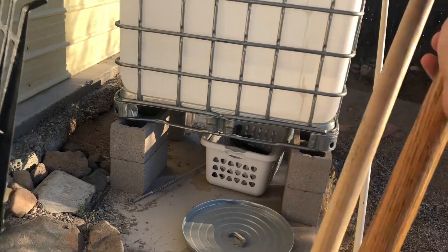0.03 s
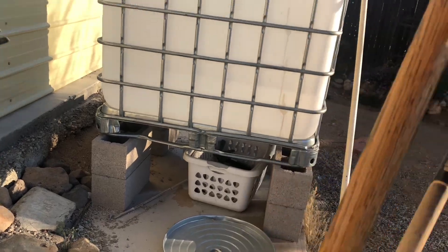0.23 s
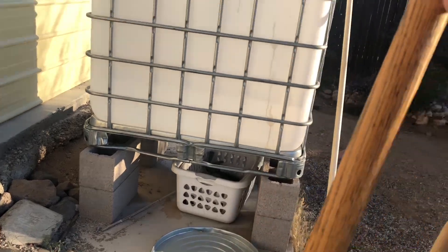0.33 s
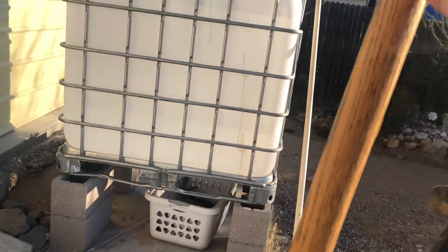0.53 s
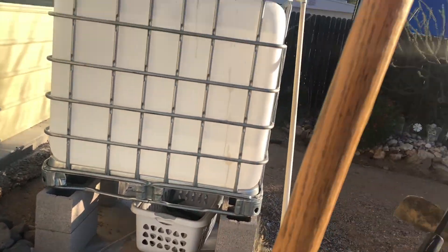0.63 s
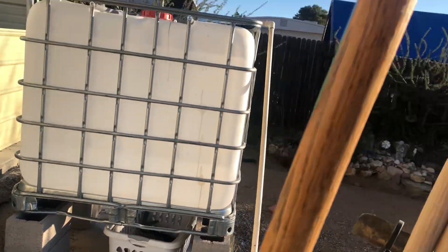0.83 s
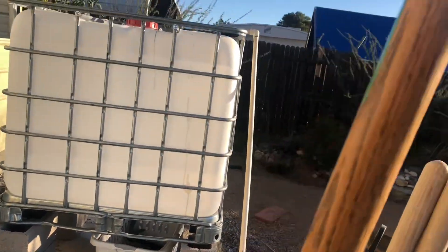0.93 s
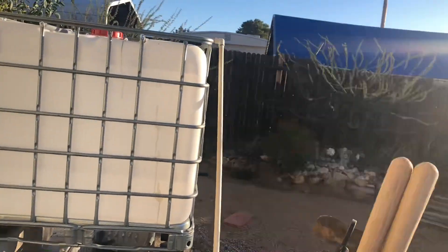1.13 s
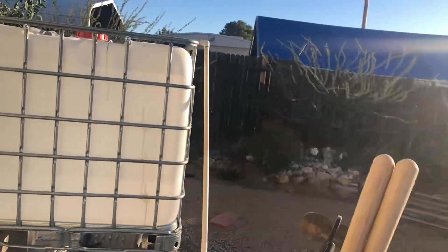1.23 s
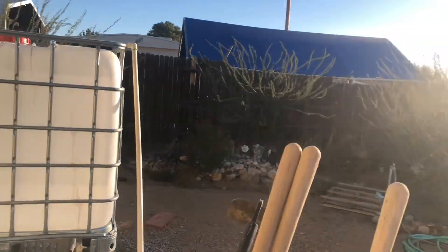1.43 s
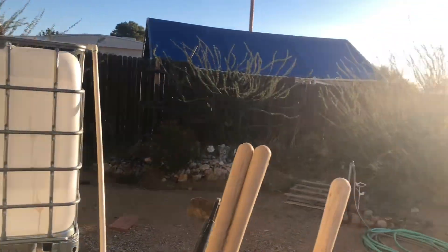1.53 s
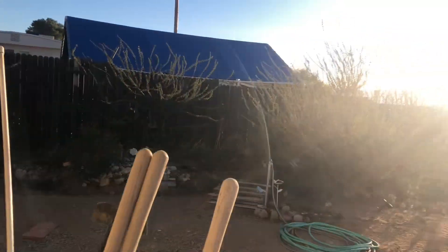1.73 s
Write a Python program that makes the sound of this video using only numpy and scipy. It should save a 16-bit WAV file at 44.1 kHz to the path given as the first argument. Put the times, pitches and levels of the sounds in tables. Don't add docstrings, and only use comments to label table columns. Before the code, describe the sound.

Close up outdoors, a handle is dragged past others with a quick cluster of hollow woody knocks and sprays of grit, then metal rasps briefly, one last knock clanks, and small stones tick over faint air noise.

```python
import sys
import numpy as np
from scipy import signal
from scipy.fft import rfft, irfft
from scipy.io import wavfile

SR = 44100
rng = np.random.default_rng(int(sys.argv[2]) if len(sys.argv) > 2 else 0)


def invert_db(level):
    return 10 ** (np.asarray(level, dtype=float) / 20)


def dump(signal):
    limited = np.clip(np.atleast_2d(signal).T, -1, 1)
    pcm = np.round(limited * 32767).astype(np.int16)
    wavfile.write(sys.argv[1], SR, pcm)


N = 79380
TIME = np.arange(N) / SR


def rms_one(x):
    return x / np.sqrt(np.mean(x ** 2) + 1e-20)


def curve(s, values):
    return np.interp(TIME, s, values)


def colour(x, spectrum):
    hz, db = np.transpose(spectrum)
    f = np.fft.rfftfreq(len(x), 1 / SR) + 1
    gain = invert_db(np.interp(np.log(f), np.log(hz), db, left=-60, right=-60))
    return rms_one(irfft(rfft(x) * gain, len(x)))


def ring(clicks, hz, t60):
    r = invert_db(-60 / (t60 * SR))
    w = 2 * np.pi * hz / SR
    return signal.lfilter([0, np.sin(w)], [1, -2 * r * np.cos(w), r * r], clicks + 1e-18)


def soften(x, hz):
    r = np.exp(-2 * np.pi * np.clip(hz, 50, 15000) / SR)
    return signal.lfilter([(1 - r) ** 2], [1, -2 * r, r * r], x)


def click_at(s, db):
    click = np.zeros(N)
    click[int(s * SR)] = invert_db(db)
    return click


def grains(per_s, spread_db):
    sizes = invert_db(spread_db * np.minimum(rng.exponential(1, N), 5)) * rng.choice([-1, 1], N)
    return rms_one(sizes * (rng.random(N) < per_s / SR))


def burst(s, db, hz, span, length):
    out, i, n = np.zeros(N), int(s * SR), 1500
    fade = np.exp(-np.arange(n) / (length * SR))
    spray = np.eye(1, n)[0] + 1.65 * rng.standard_normal(n) * fade
    band = np.clip([hz / span, hz * span], 50, 17000)
    pulse = signal.sosfilt(signal.butter(2, band, "band", fs=SR, output="sos"), spray)[:N - i]
    out[i:i + len(pulse)] = invert_db(db) * pulse / np.abs(pulse).max()
    return out


def split_at(x, hz):
    low = signal.sosfilt(signal.butter(3, hz, fs=SR, output="sos"), x)
    high = signal.sosfilt(signal.butter(3, hz, "high", fs=SR, output="sos"), x)
    return low, high


# [t/s, pressure level/dB, bright share level/dB]
RUBBING = [(0, -56, 11.5), (.05, -55, -2.5), (0.133, -51, 9.5), (.21, -44.5, 7.5), (.24, -33, -7.5),
           (0.367, -33.5, -3.5), (0.437, -44, -9), (0.476, -37.5, -3.5), (0.559, -51.5, 5.5),
           (.67, -47, -15), (0.799, -63, -5), (.97, -85.5, 4), (1.1, -60.5, -1.5), (1.22, -79.5, 20),
           (1.319, -68.5, -12), (1.349, -37.5, 2), (1.498, -55.5, -1), (1.8, -87, -16)]


def rubbing():
    times, pressure_db, bright_db = np.transpose(RUBBING)
    slips = grains(3000, spread_db=1)
    dull = rms_one(soften(slips, 1200))
    bright = rms_one(ring(slips, 2940, 0.0012) + invert_db(-8.5) * ring(slips, 5100, 0.0041))
    return invert_db(curve(times, pressure_db)) * (dull + invert_db(curve(times, bright_db)) * bright)


# [f/Hz, level/dB per Hz]
BIN_COLOUR = [(110, -53), (200, -23), (359, -8), (428, -1), (804, -9.5), (917, -10), (3300, -15),
              (5200, -30.5), (7800, -58), (13200, -120)]


def hollow():
    t = np.arange(SR // 2) / SR
    out = 0
    edges = 140 * 2 ** np.arange(0, 6.1, .5)
    white = colour(rng.standard_normal(len(t)), BIN_COLOUR)
    for low, high in zip(edges, edges[1:]):
        band = signal.sosfilt(signal.butter(2, [low, high], "band", fs=SR, output="sos"), white)
        t60 = 0.14 * (low / 500) ** -0.056
        out = out + band * invert_db(-60 * t / t60)
    return out / np.sqrt(np.sum(out ** 2))


# [t/s, peak level/dB, contact f/Hz, bin drum level/dB, bin boom level/dB]
KNOCKS = [(.069, -48, 510, -45, -74), (.121, -35, 790, -29, -71), (0.215, -11, 1420, -43, -53),
          (0.224, -24, 1350, -21, -38.5), (0.229, -14.5, 620, -16, -53), (0.273, -18, 1200, -14, -19.5),
          (0.284, -23.5, 900, -18.5, -49), (.294, -23, 3300, -49, -58), (.302, -18.5, 2030, -40, -55),
          (0.319, -23, 2960, -30, -36), (.355, -21, 1200, -38, -61), (0.385, -51, 2500, -38, -34.5),
          (0.461, -26, 2000, -25.5, -59), (0.529, -32.5, 810, -30.5, -45), (0.613, -52, 802, -30.5, -67),
          (.647, -37, 1500, -31, -69), (1.048, -62, 497, -54, -62), (1.327, -31, 1290, -31.5, -41),
          (1.335, -24.5, 1560, -13.5, -29), (1.348, -24, 2170, -25, -73), (1.366, -38, 2220, -40, -63),
          (1.442, -52, 700, -29.5, -51)]
# [f/Hz, level/dB, t60/s]
WOOD_NOTES = [(317, -12, 0.14), (562, -14.5, 0.13), (638, -27.5, 0.098), (900, -13.5, 0.13),
              (1100, -11.5, 0.13), (1263, -19.5, 0.055), (1602, -2.5, 0.032), (1865, -4, 0.022),
              (2233, -0.5, 0.017), (3152, -7, 0.02)]
# [f/Hz, level/dB, t60/s]
DRUM_NOTES = [(400, -17, 0.52), (424.6, -11, 0.428), (436, -7.5, 0.107)]
BODIES = 5


def handles():
    luck_db = rng.normal(0, 0.99, (len(KNOCKS), len(WOOD_NOTES)))
    rub = rubbing()
    hits = np.array([burst(s, db, hz, span=1.88, length=0.0031) for s, db, hz, _, _ in KNOCKS])
    drum, boom = np.zeros((2, N))
    for s, _, _, drum_db, boom_db in KNOCKS:
        drum[int(s * SR)], boom[int(s * SR)] = invert_db(drum_db), invert_db(boom_db)
    out = ring(soften(boom, 184) + invert_db(-92) * rub, 102, 0.2)
    for hz, db, t60 in DRUM_NOTES:
        out += ring(invert_db(db) * (soften(drum, 775) + invert_db(-38.5) * rub), hz, t60)
    for m, (hz, db, t60) in enumerate(WOOD_NOTES):
        drive = invert_db(db - 28) * (invert_db(luck_db[:, m]) @ hits) + invert_db(db - 33.5) * rub
        out += (-1) ** m * ring(drive, hz, t60)
    sway = np.pi * TIME / 0.12
    for k in range(BODIES):
        share = np.cos(sway / BODIES - np.pi * k / BODIES) ** 2
        drive = invert_db(6.5) * hits[k::BODIES].sum(axis=0) + rub * share
        out += invert_db(-7.5 - 3.5) * signal.fftconvolve(drive, hollow())[:N]
    out += invert_db(-9.5) * hits.sum(axis=0)
    return signal.sosfilt(signal.butter(2, 90, "high", fs=SR, output="sos"), out)


# [t/s, level/dB, f/Hz, t60/s]
PINGS = [(0, -49.5, 1009, 0.37), (0, -41.5, 782, 0.044), (0.065, -39.5, 417, 0.32), (0.092, -51, 312, 0.96),
         (.118, -39.5, 735, 0.059), (0.146, -40, 1134, 0.095), (0.161, -45, 323, 0.36),
         (.225, -23.5, 874, 0.19), (0.23, -30.5, 314, 0.19), (.276, -22.5, 900, 0.079),
         (.279, -27, 690, 0.11), (.296, -28, 490, .06), (0.322, -44, 590, .06), (0.353, -32, 895, 0.1),
         (0.359, -25, 1240, 0.076), (.375, -48, 650, 0.087), (.39, -41, 124.6, 0.56),
         (0.461, -35, 1140, 0.23), (.468, -43, 650, .15), (0.472, -51.5, 115.5, 1),
         (.499, -34.5, 920, 0.16), (0.523, -32.5, 434, 0.17), (.525, -36, 873, 0.11),
         (.61, -43.5, 434, 0.11), (0.539, -43, 110, 0.15), (.55, -41, 1100, 0.13), (.65, -46, 880, 0.075),
         (.655, -46.5, 537, 0.26), (.69, -42, 424, .3), (0.701, -51.5, 107, .4), (1.043, -45, 388, 0.056),
         (1.076, -48.5, 162, 0.14), (1.1, -47, 423, 0.059), (1.162, -45.5, 410, 0.046),
         (1.287, -58, 180, 0.073), (1.286, -50, 1100, 0.045), (1.336, -40, 653, 0.22),
         (1.34, -32.5, 730, 0.19), (1.344, -33, 1906, 0.2), (1.38, -44, 812, 0.52),
         (1.506, -42, 460, 0.072)]


def pings():
    out = np.zeros(N)
    for s, db, hz, t60 in PINGS:
        out += ring(soften(click_at(s, db + 6), 0.94 * hz), hz, t60)
    return out


# [t/s, rise/s, level/dB, t60/s, brightest f/Hz]
GRIT = [(0, 0.027, -61.5, 1.0, 7500), (0.088, 0.18, -44, 0.37, 8600), (0.18, .002, -59, 0.27, 13200),
        (0.219, .002, -55, 0.78, 12000), (0.273, 0.0031, -38.5, 0.18, 11500),
        (0.338, 0.052, -52, 0.61, 9700), (0.403, 0.006, -45, 0.21, 11100), (0.457, 0.041, -48, 0.47, 9600),
        (0.508, 0.0032, -51, 0.16, 15000), (.561, 0.0025, -43.5, 0.075, 11700),
        (0.589, 0.0012, -46.5, 0.077, 9500), (0.644, .002, -54, 0.13, 8200),
        (1.738, 0.046, -60.5, 0.33, 12000)]
# [f/Hz, level/dB per Hz]
SAND_COLOUR = [(2650, -19), (4500, -12.5), (5770, -16.5), (6520, -14.5), (10600, -7), (16000, -10)]
# [t/s, length/s, level/dB, brightest f/Hz]
BRUSHES = [
    (1.217, 0.027, -58.5, 11900),
    (1.256, 0.067, -61, 13800),
]


def grit():
    out = np.zeros(N)
    sand = colour(grains(9800, spread_db=4), SAND_COLOUR)
    for s, rise, db, t60, hz in GRIT:
        fade = invert_db(db - 60 * np.clip(TIME - s - rise, 0, None) / t60)
        swell = fade * np.clip((TIME - s) / rise, 0, 1)
        focus = rms_one(ring(sand, hz, 5.5 * 2 / hz))
        out += swell * np.roll(sand + invert_db(-7.5) * focus, int(s * SR))
    for s, length, db, hz in BRUSHES:
        gate = np.clip(np.minimum(TIME - s, s + length - TIME) / 0.0076, 0, 1)
        focus = invert_db(-4) * rms_one(ring(sand, hz, 21 / hz))
        body = invert_db(-11.5) * rms_one(ring(sand, 4900, 0.0046))
        out += invert_db(db) * gate * (sand + focus + body)
    return out


# [t/s, level/dB]
RUSTLE = [
    (0, -60.5),
    (.95, -66),
    (1.4, -70.5),
    (1.8, -75),
]


def rustle():
    return invert_db(curve(*np.transpose(RUSTLE))) * colour(rng.standard_normal(N), SAND_COLOUR)


# [f/Hz, level/dB per Hz]
OUTDOOR_COLOUR = [(15, -21), (25, 12), (166, 12), (416, 5.5), (575, 5), (796, 4), (2160, -5.5),
                  (11900, -25.5), (16000, -19)]


def outdoor_floor():
    return invert_db(-60) * colour(rng.standard_normal(N), OUTDOOR_COLOUR)


# [t/s, peak level/dB, f/Hz]
TICKS = [(0.0398, -43, 11100), (0.9784, -33, 11600), (1.027, -27, 12600), (1.0724, -32, 11700),
         (1.0884, -29, 11900), (1.1272, -28, 13500), (1.1424, -23, 12100), (1.1665, -21, 11900),
         (1.2950, -36, 9500), (1.3349, -37.5, 7000), (1.6749, -39, 12600), (1.702, -37, 10000),
         (1.7144, -48, 5200), (1.7404, -38, 6000), (1.7494, -36, 15700), (1.7604, -34, 12400),
         (1.7704, -72, 9730), (1.7753, -34, 8360), (1.7816, -31, 14300), (1.7876, -23.5, 10500),
         (1.7934, -28, 13500)]


def gravel_ticks():
    out = sum(burst(s, db - 11, hz, span=1.5, length=0.0006) for s, db, hz in TICKS)
    return out + burst(.976, -45, 190, span=2.2, length=.003)


# [t/s, level/dB, f/Hz]
THUMPS = [
    (0.29, -56, 50),
    (1.138, -40, 44.5),
    (1.6, -64, 40),
    (1.7, -64, 71),
    (1.77, -50, 30),
]


def handling_thumps():
    return sum(ring(soften(click_at(s, db), 56), hz, 0.22) for s, db, hz in THUMPS)


# [t/s, peak level/dB, f/Hz, span as a
CATCHES = [
    (.9795, -38, 5000, 3.0),
    (.9795, -41, 400, 3.0),
    (1.0895, -33, 8600, 1.25),
    (1.1665, -33, 8000, 2.5),
    (.622, -54, 13000, 1.3),
    (.6465, -42, 2500, 2.5),
]


def catches():
    return sum(burst(s, db, hz, span, length=0.0006) for s, db, hz, span in CATCHES)


# [t/s, level/dB]
SCRAPE = [
    (.975, -73),
    (.982, -47),
    (1.03, -48.5),
    (1.06, -50.5),
    (1.09, -44),
    (1.13, -51),
    (1.16, -46),
    (1.176, -52),
    (1.183, -59),
]
# [f/Hz, level/dB per Hz]
SCRAPE_COLOUR = [(1180, -43), (2000, -25), (2960, -8.5), (3810, -18), (4570, -3.5), (5070, 2.5),
                 (7380, -19.5), (12000, 0), (16000, -6)]
# [f/Hz, width/Hz, level/dB]
HEAD_NOTES = [(4620, 330, 4.5), (9360, 580, 1.5), (11900, 1900, 10), (14200, 1300, 3)]


def scrape():
    lumps = invert_db(2.6 * rms_one(soften(rng.standard_normal(N), 52)))
    rasp = colour(lumps * grains(6000, spread_db=2), SCRAPE_COLOUR)
    notes = sum(invert_db(db) * rms_one(ring(rasp, hz, 1.8 / width)) * .5 for hz, width, db in HEAD_NOTES)
    low, high = split_at(rasp + notes, 6500)
    rasp = high + low * np.clip((TIME - 1.005) / 0.032, .25, 1)
    touching = (TIME > SCRAPE[0][0]) * (TIME < SCRAPE[-1][0])
    return invert_db(curve(*np.transpose(SCRAPE))) * rms_one(rasp) * touching


# [t/s], [f/Hz] and [level/dB]
SQUEAK_S = (1.16, 1.215, 1.3)
SQUEAK_HZ = (1700, 2050, 1850)
SQUEAK_DB = (-60, -58, -66)


def squeak():
    wobble = rms_one(soften(rng.standard_normal(N), 300))
    note = wobble * np.sin(2 * np.pi * np.cumsum(curve(SQUEAK_S, SQUEAK_HZ)) / SR)
    return invert_db(curve(SQUEAK_S, SQUEAK_DB)) * note * (TIME > SQUEAK_S[0]) * (TIME < 1.33)


# [f/Hz, level/dB per Hz]
CLANK_COLOUR = [(1470, -32), (2500, 6.5), (3740, -44), (3920, -2), (4990, -3), (7300, 1.5), (8270, -7.5),
                (15200, -13), (16000, -15)]


def clank():
    since = np.clip(TIME - 1.329, 0, None)
    rise = np.clip(since / 0.014, 0, 1) ** 2
    low, high = split_at(rise * colour(grains(5000, spread_db=-8), CLANK_COLOUR), 8000)
    rattle = invert_db(-31 - 60 * since / 0.23) * (low + high * invert_db(6.5 - 96 * since))
    snap = burst(1.335, -30, 15200, span=1.03, length=0.0018)
    return rattle + snap


def scene():
    background = outdoor_floor() + rustle()
    wood = handles() + pings()
    metal = grit() + scrape() + squeak() + clank()
    ground = gravel_ticks() + handling_thumps()
    return (background + wood + metal + ground + catches())[None]


def roll_off(x):
    return signal.sosfilt(signal.butter(12, 16960, fs=SR, output="sos"), x)


def record(dry):
    steep = signal.ellip(12, .3, 70, 15950, fs=SR, output="sos")
    return roll_off(signal.sosfilt(steep, dry))


dry = scene()
out = record(dry)
dump(out)
```